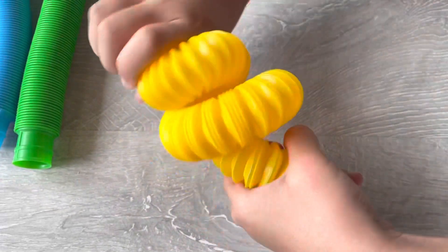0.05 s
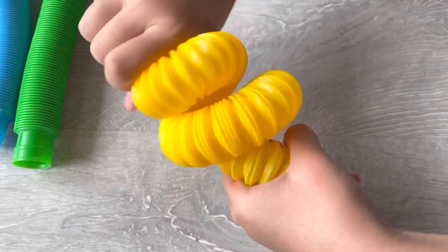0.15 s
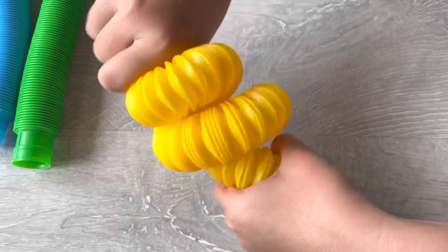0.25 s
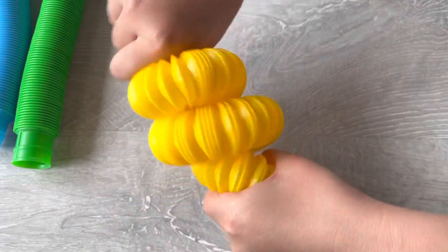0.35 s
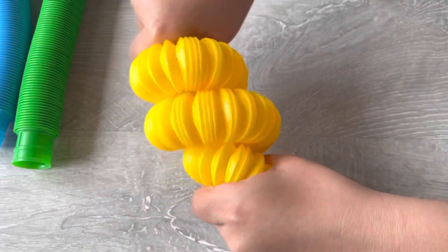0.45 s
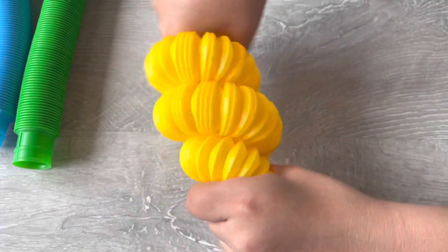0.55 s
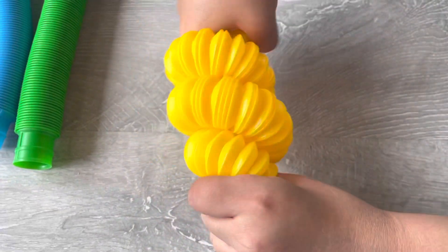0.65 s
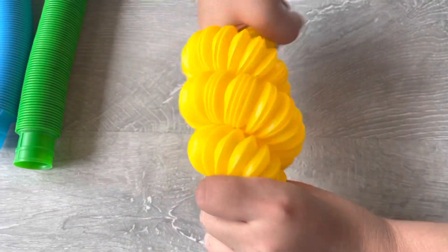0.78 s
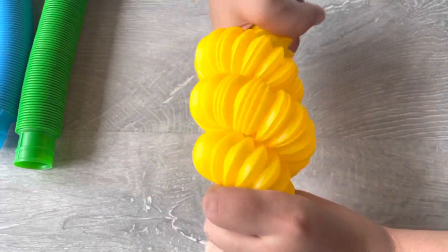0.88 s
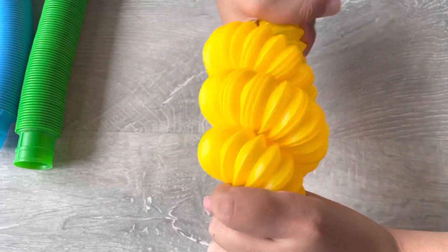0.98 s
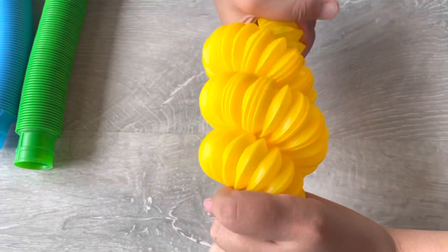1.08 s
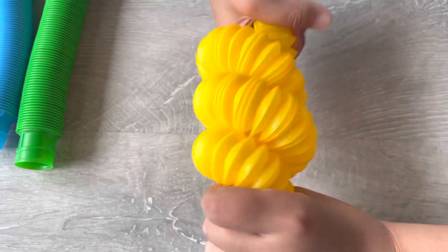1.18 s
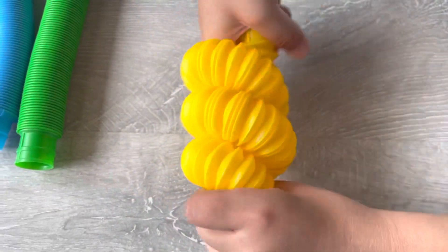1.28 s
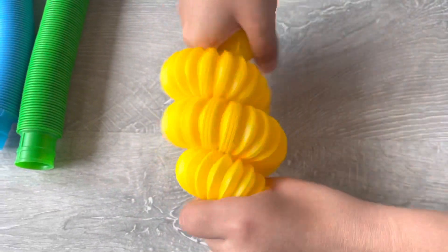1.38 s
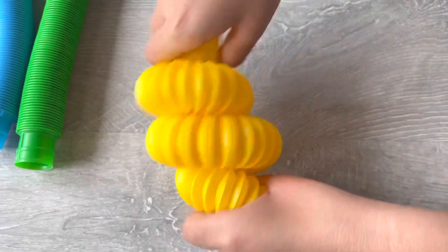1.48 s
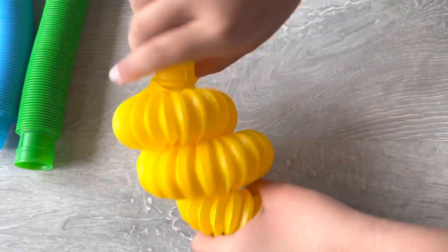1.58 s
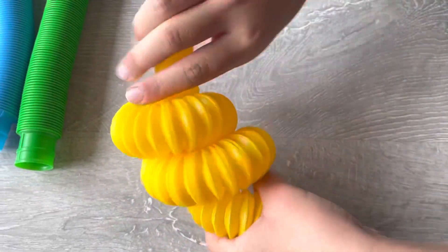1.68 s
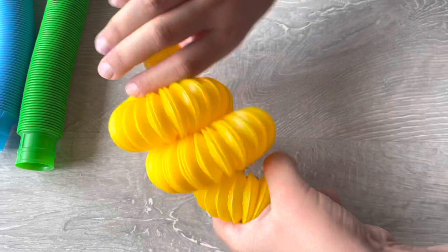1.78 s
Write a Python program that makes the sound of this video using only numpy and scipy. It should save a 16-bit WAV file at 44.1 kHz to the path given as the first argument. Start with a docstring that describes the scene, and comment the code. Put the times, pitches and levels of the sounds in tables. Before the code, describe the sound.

Ribbed plastic tube popping and crackling rapidly as hands squash and twist it up close

```python
"""Twisting a ribbed plastic tube, close up

Hands twist and squash a coiled, ribbed plastic tube close to a phone in a quiet room.
Each rib that flips over pops: a noisy crack, then decaying tones of the air in the tube, bass last.
Small ribs crackle in between as random weaker pops; skin and plastic rub as fine filtered clicks.
Sparse reflections add the room's tail, over faint air noise and mains hum.
The loudest pops overload the microphone."""
import sys
import numpy as np
from scipy import signal
from scipy.fft import rfft, irfft
from scipy.io import wavfile

SR = 44100
rng = np.random.default_rng(int(sys.argv[2]) if len(sys.argv) > 2 else 0)


def to_wav(s):
    """Save 16-bit WAV."""
    ch = np.atleast_2d(s).T  # columns
    pcm = np.round(np.clip(ch, -1, 1) * 32767)  # PCM
    wavfile.write(sys.argv[1], SR, pcm.astype(np.int16))


def voltage_ratio(decibels):
    """Convert decibels (scalar or array-like) to amplitude ratios, 20 dB per decade."""
    exponent = np.asarray(decibels, float) / 20
    return 10 ** exponent


N = 81585  # length [samples]


def evened(x):
    """Scales to rms 1."""
    return x / np.sqrt(np.mean(x ** 2) + 1e-20)


def read(points, hz):
    """Reads a (frequency, value) table on a log-frequency axis."""
    f, value = np.transpose(points)
    return np.interp(np.log(hz + 1), np.log(f + 1), value)


def level(curve):
    """Gain over time from (time [s], level [dB]) rows."""
    s, db = np.transpose(curve)
    return voltage_ratio(np.interp(np.arange(N) / SR, s, db))


def coloured(x, points):
    """Filters by a (frequency [Hz], gain [dB]) table without shifting phase."""
    hz = np.fft.rfftfreq(x.shape[-1], 1 / SR)
    return irfft(rfft(x) * voltage_ratio(read(points, hz)), x.shape[-1])


def add(mix, s, sound):
    """Mixes a stereo sound in at a time in seconds."""
    part = mix[:, round(s * SR):][:, :sound.shape[1]]
    part += sound[:, :part.shape[1]]


def ports(x):
    """Phase difference between the two microphone ports, shared equally by left and right."""
    # phase by which the left port leads the right: (frequency [Hz], lead [rad])
    port_lead = [(0, -0.5), (1120, 1.2), (1890, -1.76), (2410, 0.44), (2930, 2.5), (3190, 1.04),
                 (4910, 0.43), (6720, 2), (9220, 4.5), (10400, 7), (12100, 7.5), (13100, 7.5),
                 (15700, 10.5), (16700, 13)]
    lead = read(port_lead, np.fft.rfftfreq(x.shape[1], 1 / SR)) * np.array([[.5], [-.5]])
    return irfft(rfft(x) * np.exp(1j * lead), x.shape[1])


def air():
    """Quiet room noise, partly alike at the two microphones, and a faint mains hum."""
    # spectrum of the room noise: (frequency [Hz], relative level [dB per Hz])
    air_colour = [(15, -50), (25, -6), (108, 2), (137, -4), (180, -15), (988, -44), (3250, -53),
                  (3920, -25), (5730, -43), (6560, -35), (7110, -57.5), (16000, -42.5)]
    # left-right likeness of the room noise: (frequency [Hz], likeness [0 to 1])
    air_likeness = [(30, 0.39), (200, 1), (1000, 0.54), (8000, 0.82)]
    air_db, hum_hz, hum_peak_db = -54, 99.5, -60
    left, other = rfft(rng.standard_normal((2, N)))
    same = np.clip(read(air_likeness, np.fft.rfftfreq(N, 1 / SR)), 0, 1)
    right = same * left + np.sqrt(1 - same ** 2) * other
    noise = coloured(irfft(np.array([left, right]), N), air_colour)
    hum = np.sin(2 * np.pi * hum_hz * np.arange(N) / SR)
    return voltage_ratio(air_db) * evened(noise) + voltage_ratio(hum_peak_db) * hum


def grains(per_s, spread_db):
    """Clicks of random time, sign and size."""
    size = voltage_ratio(spread_db * np.minimum(rng.exponential(1, N), 4)) * rng.choice([-1, 1], N)
    return size * (rng.random(N) < per_s / SR)


def crackle(count=8):
    """Small ribs pop at random, as hard as the hands press; each click takes one of a few pop shapes."""
    # small ribs crackling: (time [s], level [dB])
    crackle_level = [(0, -51.5), (.2, -54.5), (.25, -42.5), (.4, -50.5), (.45, -27.5), (.55, -51),
                     (.64, -43), (.72, -33.5), (.86, -34.5), (1.0, -41), (1.18, -61), (1.23, -41),
                     (1.31, -45), (1.38, -36), (1.42, -37), (1.46, -56), (1.55, -59.5), (1.7, -57),
                     (1.85, -62.5)]
    clicks = evened(grains(per_s=700, spread_db=2.5)) * level(crackle_level)
    which = rng.integers(0, count, N)
    out = 0
    for k in range(count):
        shape = pop(second_db=7, lowest_db=-5.5, upper_db=-6, crack_db=-19.5,
                    pitch=1, best_hz=1100, bright_db=0)
        shape = shape / np.linalg.norm(shape[0])
        out = out + signal.oaconvolve((clicks * (which == k))[None], shape, axes=1)
    return out[:, :N]


def rub():
    """Fine dry grains of skin and plastic sliding."""
    # skin and plastic rubbing: (time [s], level [dB])
    rub_level = [(0, -57), (.04, -51), (.065, -63), (.1, -55), (.16, -60.5), (.2, -56.5), (.4, -57.5),
                 (.46, -46.5), (.64, -63), (.72, -57), (1.0, -71.5), (1.16, -58.5), (1.22, -47),
                 (1.31, -55.5), (1.34, -48.5), (1.365, -48), (1.375, -36), (1.42, -42), (1.44, -55),
                 (1.5, -73), (1.69, -61), (1.72, -56), (1.76, -72.5), (1.85, -59.5)]
    # spectrum of the rubbing: (frequency [Hz], relative level [dB per Hz])
    rub_colour = [(410, -41), (700, -6), (811, -17), (1070, -7.5), (1640, -21), (2120, -15), (5540, -22),
                  (7140, -37.5), (9200, -28), (15500, -33), (17000, -60)]
    apart = .4  # strength of the grains that differ between the two microphones
    both, left, right = (grains(per_s=5000, spread_db=-1.5) for _ in range(3))
    sliding = coloured(both + apart * np.array([left, right]), rub_colour)
    return level(rub_level) * evened(ports(sliding))


def ring(tones, pitch, best_hz=None):
    """Dying tones, smeared so that lower frequencies leave the ribbed tube later; peak 1 (mid of the pair)."""
    size = 8192  # samples
    rise_cycles, lag_cycles, lag_knee_hz = 0.59, 1.4, 232  # the lag levels off below the knee
    cutoff_hz = 203.6  # the open tube sheds no deep bass
    scatter, scatter_db = .03, 3.5  # change of pitch (fraction) and level from rib to rib
    favour_db_per_octave = 7.5  # loss away from the tone that the rib drives best
    hz, db, t60, pan_db, lead = np.transpose(tones)[:, :, None]
    if best_hz:
        db = db - favour_db_per_octave * abs(np.log2(hz / best_hz))
    luck = rng.standard_normal((2, len(tones), 1))
    t = np.arange(size) / SR
    side = np.array([.5, -.5])[:, None, None]  # left, right
    hz = hz * pitch * (1 + scatter * luck[0])
    swell = 1 - np.exp(-t * hz / rise_cycles)
    fade = voltage_ratio(db + scatter_db * luck[1] + side * pan_db - 60 * t / t60)
    wave = (swell * fade * np.sin(2 * np.pi * hz * t + side * lead)).sum(axis=1)
    wave = signal.sosfilt(signal.butter(6, cutoff_hz, "high", fs=SR, output="sos"), wave)
    # a phase that follows log frequency delays each frequency by lag_cycles / f
    f = np.fft.rfftfreq(size, 1 / SR) + lag_knee_hz
    wave = irfft(rfft(wave) * np.exp(-2j * np.pi * lag_cycles * np.log(f)), size)
    wave = wave[:, :size * 3 // 4]
    return wave / abs(wave.mean(axis=0)).max()


def crack(bright_db):
    """An uneven burst of ticks as the rib flips, with a duller rattle behind it."""
    # spectrum of the crack: (frequency [Hz], relative level [dB per Hz])
    crack_colour = [(880, -7), (1500, -23), (2930, -1.5), (3180, -7), (5130, -16.5), (5910, -12.5),
                    (7170, -17.5), (9820, -20), (13700, -27.5), (15200, -12.5), (17000, -52.5)]
    snap_t60_s, rise_s, rattle_db, rattle_t60_s = 0.014, 0.00043, -12.5, 0.067
    ticks_db = 6  # unevenness inside the crack
    apart = .3  # strength of the noise that differs between the two microphones
    t = np.arange(2048) / SR
    ticks = np.repeat(voltage_ratio(ticks_db * rng.standard_normal(128)), 16)
    noise = rng.standard_normal((2, 3, 2048))  # snap and rattle: common, left, right
    snap, rattle = noise[:, :1] + apart * noise[:, 1:]
    snap = snap * ticks * voltage_ratio(-60 * t / snap_t60_s)
    rattle = coloured(rattle, [(2000, 2.5), (10000, -24.5)])
    rattle = rattle * voltage_ratio(rattle_db - 60 * t / rattle_t60_s)
    burst = (snap + rattle) * (1 - np.exp(-t / rise_s))
    burst = np.pad(burst, ((0, 0), (64, 0)))  # space for the filters to spread ahead
    burst = ports(coloured(burst, crack_colour))
    burst /= np.sqrt((burst[:, 64:192] ** 2).mean())  # the first 128 samples get rms 1
    return coloured(burst, [(4970, 0), (8400, bright_db)])[:, 64:]


def pop(second_db, lowest_db, upper_db, crack_db, pitch, best_hz, bright_db):
    """One rib flips: the crack, and three groups of air tones ringing in the tube."""
    # Tube tones: (frequency before pitch factor and scatter [Hz], relative level [dB], t60 [s],
    # left minus right [dB], left lead [rad])
    lowest_tones = [(252.1, -2.5, 0.067, 0.1, .01), (284.3, -3.5, 0.061, -1.3, .01)]
    # the same columns, for the second tone
    second_tones = [(540, 7, 0.016, 1.5, 0.23), (645.3, -5.5, 0.027, 3, -.1),
                    (522.7, -12.5, 0.038, 2.8, .1)]
    # the same columns, for the upper tones
    upper_tones = [(926, 12, 0.018, 0.56, -0.99), (1090, 3.5, 0.021, -.5, 0.0082),
                   (1214, -1, 0.018, -.5, -0.25), (1371.4, 0.5, 0.041, -.5, -0.7),
                   (1580, 0, 0.019, -0.79, -0.84), (1964, -4.5, 0.035, -1, .2)]
    out = voltage_ratio(second_db) * ring(second_tones, pitch)
    out = out + voltage_ratio(lowest_db) * ring(lowest_tones, 1)
    out = out + voltage_ratio(upper_db) * ring(upper_tones, 0.96, best_hz)
    add(out, 0, voltage_ratio(crack_db) * crack(bright_db))
    return out


def room(x):
    """Sparse reflections, each band dying at its own speed."""
    # decay of the room: (frequency [Hz], t60 [s])
    room_t60 = [(150, 0.42), (300, 0.37), (600, 0.5), (1400, 0.76), (3700, 0.6), (9000, 0.43)]
    same = 0.63  # weight of the reflections common to both microphones
    taps = np.zeros((3, SR))
    # one reflection at random in every 20 samples
    at = np.arange(300, SR - 20, 20) + rng.integers(0, 20, (3, (SR - 301) // 20))
    np.put_along_axis(taps, at, rng.choice([-1., 1.], at.shape), 1)
    hz, t, z = signal.stft(same * taps[0] + (1 - same) * taps[1:], SR, nperseg=512)
    z = z * voltage_ratio(-60 * t / read(room_t60, hz)[:, None])
    tail = signal.istft(z, SR, nperseg=512)[1]
    return signal.fftconvolve(x, tail / np.linalg.norm(tail[0]), axes=1)[:, :N]


def scene():
    """Pops, crackle and rubbing close by, with the room's tail and its air."""
    # Rib pops: (time [s], second tone [dB], lowest tones [dB], upper tones [dB], crack [dB],
    # pitch factor of the second tone [ratio], upper tone that the rib drives best [Hz],
    # crack brightness [dB])
    rib_pops = [(0.013, -66, -35.5, -44, -51, 1.8, 1200, 5.5), (0.031, -27, -31.5, -50, -59, 0.77, 851, 22),
                (0.175, -39, -42.5, -52, -62.5, 0.72, 1090, 7),
                (0.218, -8, -18.5, -26.5, -29.5, 0.86, 1460, 9),
                (0.262, -8.5, -29, -15.5, -28, 0.98, 1030, 0.8),
                (0.278, -10.5, -33, -17.5, -32, 0.97, 1090, -0.4),
                (0.287, -30, -27, -39, -46, 1.01, 1348, 0.7),
                (0.323, -15, -21, -22.5, -35.5, 1.08, 1394, 7), (0.33, -6.5, -26, -26, -35, 0.96, 1020, 3),
                (0.368, -19, -21.5, -29.5, -42.5, 1.12, 1000, 6.7),
                (0.407, -19, -24, -38, -47, 0.82, 975, -1), (0.419, -32.5, -39, -28, -44, 1.06, 980, 5.5),
                (0.431, -13, -14.5, -23.5, -33.5, 1.01, 1360, 3.3),
                (0.457, -8, -13, -14, -24.5, 1.05, 1378, 0.6), (0.466, -7, -18, -2, -19, 1.01, 1340, -6),
                (0.507, -3, -30, 1, -16, 1.04, 1124, -2), (0.512, 2.5, -7, -8, -16.5, 1.04, 851, 2.6),
                (0.523, -3.5, -31.5, -6.5, -20.5, 1.19, 1017, -3.7),
                (0.545, -26, -27, -31.5, -33, 0.62, 960, 1.5),
                (0.564, -9, -14.5, -21.5, -25.5, 0.91, 1007, 0.3),
                (0.588, -0.5, -4.5, -6, -16, 1.05, 1010, -6.5),
                (0.607, -17, -15.5, -23.5, -29, 1.15, 1010, -2.7),
                (0.616, 2, -35.5, 1.5, -22, 1.01, 933, -0.5),
                (0.631, -15.5, -14, -46.5, -34.5, 1.01, 980, 2.3),
                (0.683, -3.5, -18.5, -16, -23.5, 1.164, 1340, -0.8),
                (0.708, -37.5, -26.5, -27.5, -31, 0.64, 851, 2), (0.748, 0, -6, -3, -17, 1.01, 895, -5.5),
                (0.798, -6.5, -13, -16.5, -23, 1.2, 931, -5.8),
                (0.818, 1.5, -6, -1.5, -17.5, 1.03, 907, -5.2),
                (0.911, -4, -12, -8.5, -18, 1.14, 877, -4.7),
                (0.916, -8.5, -2.5, -3, -15, 0.72, 880, -10.2),
                (0.932, 4, -19.5, -1.5, -16, 1.032, 920, -5.8),
                (0.955, -28.5, -23.5, -39.5, -43.5, 1.01, 969, -13),
                (0.975, 0.5, -7, -4.5, -17.5, 1.034, 947, -12.5),
                (0.991, -20.5, -30, -36.5, -51.5, 1.25, 851, -11),
                (1.22, -26, -27, -32, -40, 1.06, 920, 8.5), (1.26, -14, -25.5, -34, -37, 0.83, 955, -3),
                (1.325, -18, -23, -34.5, -25.5, 0.93, 886, 0.1),
                (1.328, -2.5, -14.5, -8, -18.5, 0.95, 1030, 4.9),
                (1.341, -49, -20.5, -23.5, -31.5, 1.3, 1363, 2.5),
                (1.369, -9, -12, -24, -25.5, 0.9, 960, 1.5), (1.388, -20, -35.5, -29, -35, 1.1, 1010, 0.1),
                (1.404, -30.5, -20.5, -24, -39, 1.24, 1030, 0.1),
                (1.412, -40, -39, -35, -38, 0.75, 1120, -1), (1.421, -19.5, -28.5, -39, -49, 0.82, 1360, 8),
                (1.577, -39.5, -45.5, -67.5, -66.5, 0.79, 1072, 2),
                (1.646, -32.5, -35, -39.5, -40, 0.91, 1076, -1.5),
                (1.698, -35.5, -52, -52.5, -61, 0.8, 1090, 2.2)]
    room_db = -19.5
    tube = crackle() + rub()
    for s, *how in rib_pops:
        add(tube, s, pop(*how))
    return tube + voltage_ratio(room_db) * room(tube) + air()


def roll_off(x):
    """The treble ends steeply here."""
    return signal.sosfilt(signal.butter(12, 17140, fs=SR, output="sos"), x)


def record(dry):
    """The microphone loses the top above 16.6 kHz and overloads hard at full scale."""
    lowpass = signal.firwin(255, 16600, window=("kaiser", 9), fs=SR)
    x = signal.oaconvolve(dry, lowpass[None], "same")
    mix = np.clip(x, -1, 1)
    return roll_off(mix)


dry = scene()
out = record(dry)
to_wav(out)
```